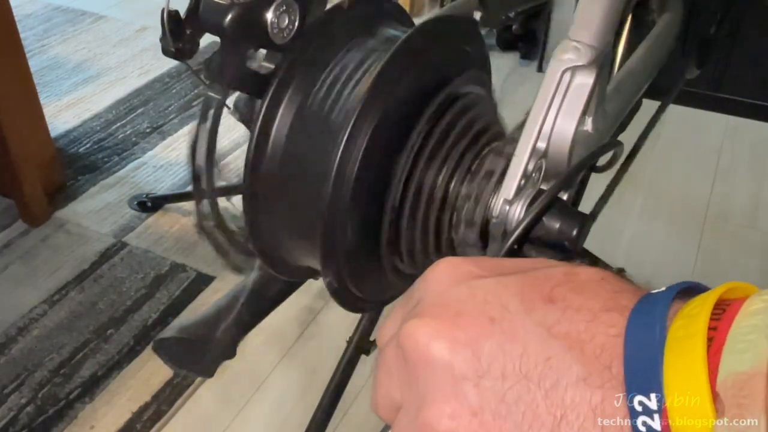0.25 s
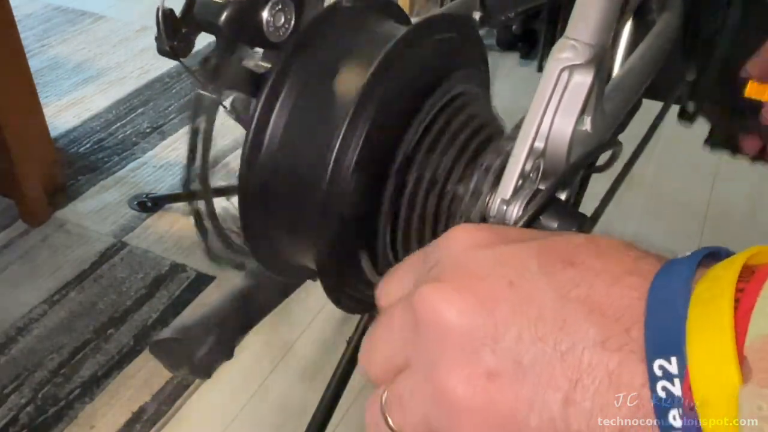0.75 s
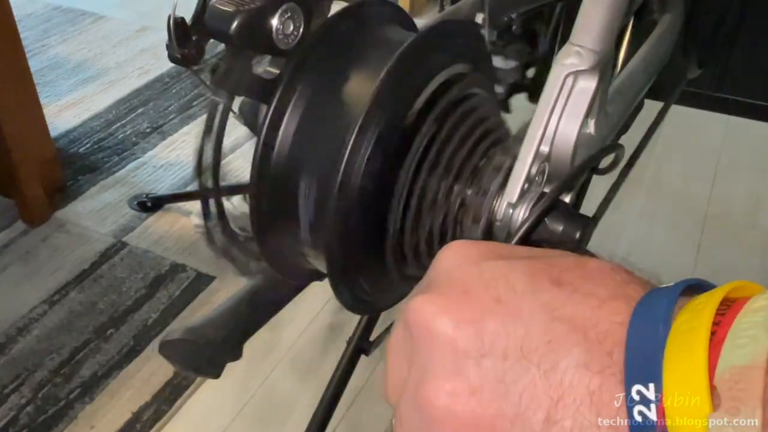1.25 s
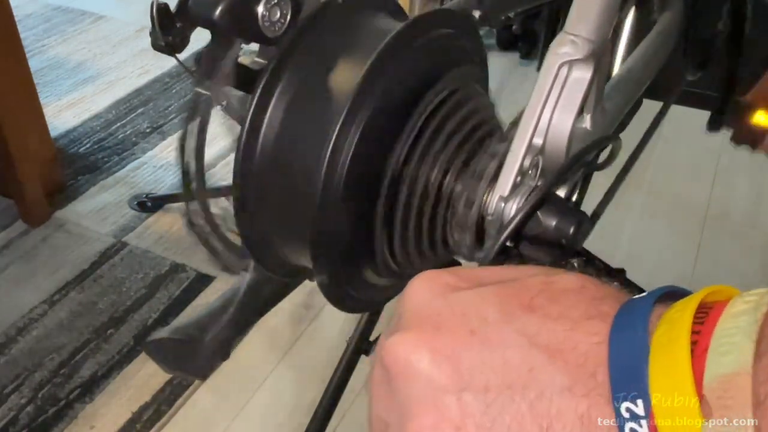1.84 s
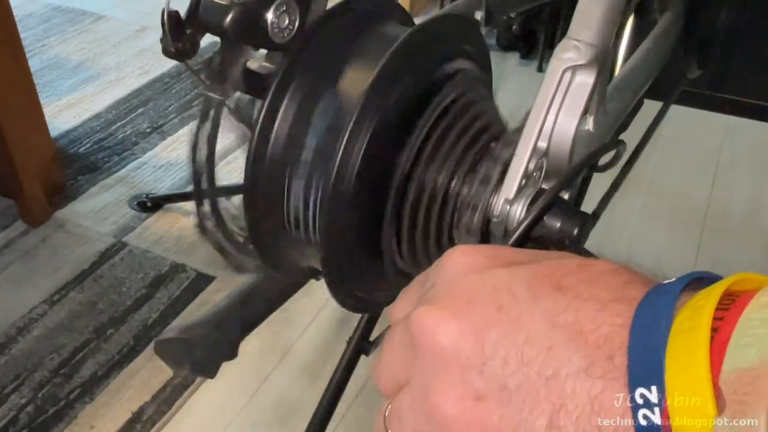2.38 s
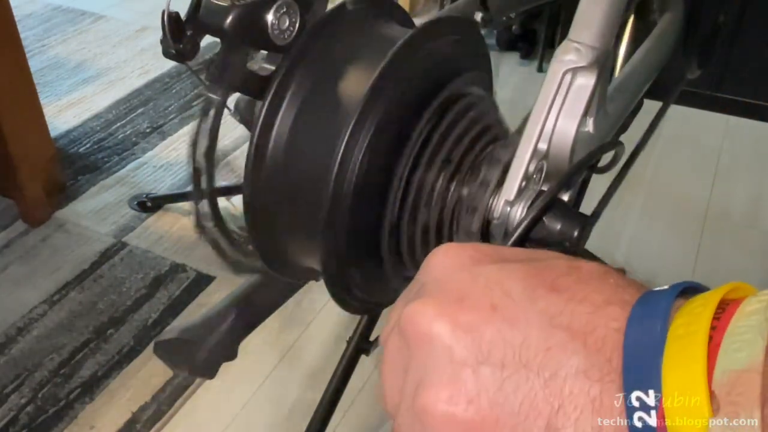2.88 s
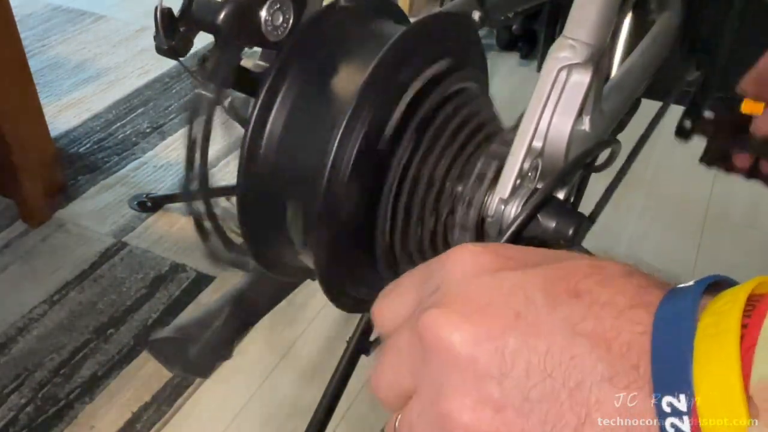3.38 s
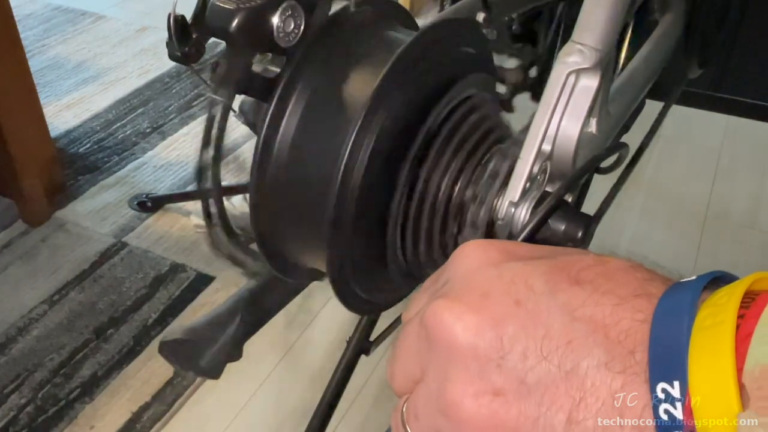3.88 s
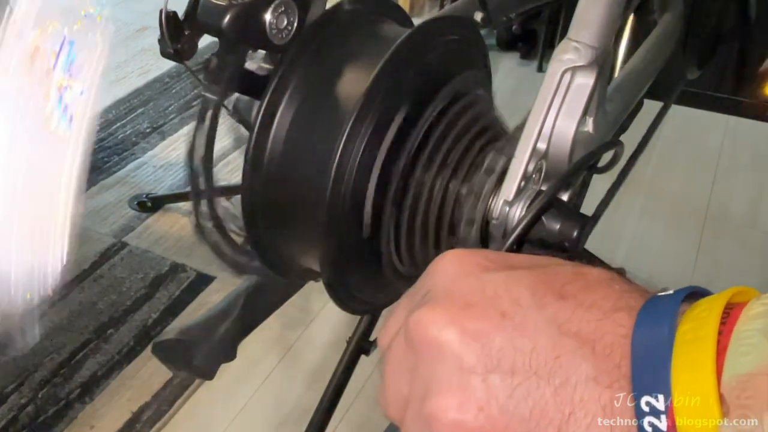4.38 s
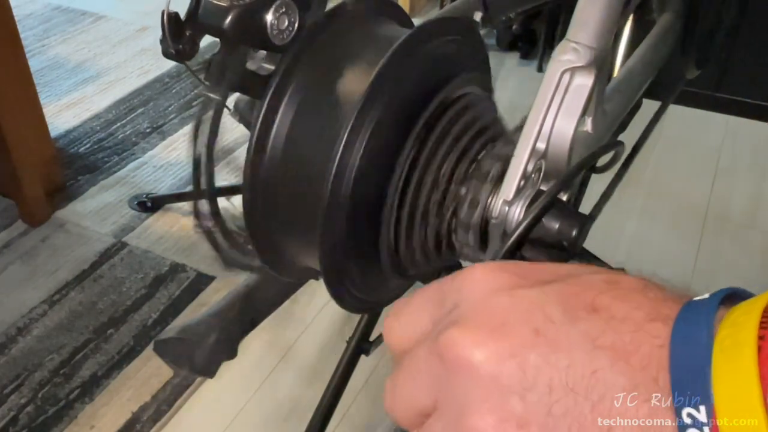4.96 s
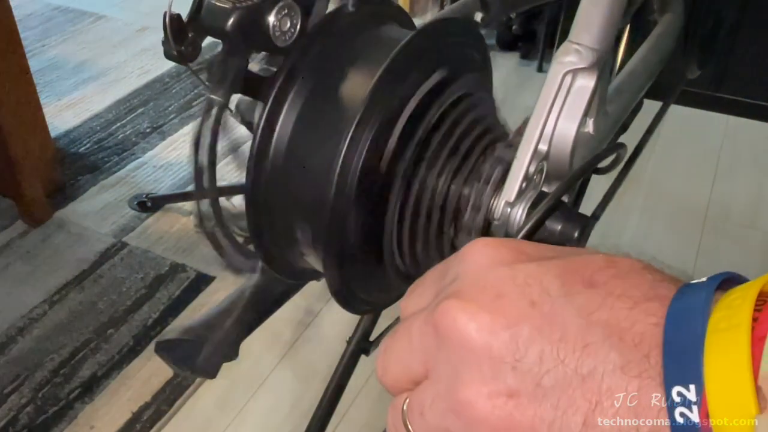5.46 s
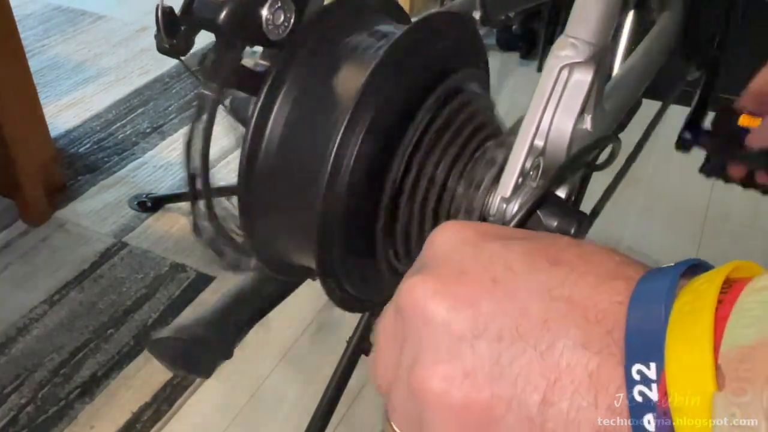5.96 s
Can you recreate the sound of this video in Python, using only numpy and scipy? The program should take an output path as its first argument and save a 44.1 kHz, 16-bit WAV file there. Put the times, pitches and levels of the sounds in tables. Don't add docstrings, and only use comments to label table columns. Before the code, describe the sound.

A bicycle wheel is cranked by hand on a stand in a small room, heard close in stereo. From 0 s a quiet bed runs throughout: low unsteady rumble, faint mains hum, dry grainy chain rustle and slightly irregular ticks, about 38 teeth a second, with thin clicks between. A soft frame knock comes near 0.3 s, a light slap at 0.7 s, a dull rock of the stand around 1 s, and small catches at 1.2 and 1.6 s. From 2.2 s the chain snaps back, soon roughly every 0.17 s, with slight wheel humming around 2.5 to 3.7 s. Snaps are moderate until 4.3 s, then grow hard: a small catch click followed by a bright, dry metallic crack, cage rattle and hollow thud. The loudest fall around 5.2, 5.6 and 5.9 s, with short room reflections, continuing until the cut near 6.2 s.

```python
import sys
import numpy as np
from scipy import signal
from scipy.fft import rfft, irfft, next_fast_len
from scipy.io import wavfile
from scipy.ndimage import map_coordinates

SR = 44100
rng = np.random.default_rng(int(sys.argv[2]) if len(sys.argv) > 2 else 0)


def volts_from_db(level):
    exponent = np.asarray(level, float) / 20
    return 10 ** exponent


def wav_record(signal):
    frames = np.transpose(np.atleast_2d(signal))
    bounded = np.clip(frames, -1, 1)
    quanta = np.round(bounded * 32767).astype(np.int16)
    wavfile.write(sys.argv[1], SR, quanta)


N = 274302
TIME_S = np.arange(N) / SR
TICK_GROWS = 0.2

# frequency_hz, level_db, t60_s
FRAME_MODES = [(197.8, -10, 0.12), (251, -8, 0.048), (352.2, 4, 0.049), (445, -10, 0.19), (485, -10, 0.13),
               (568.7, -1.5, 0.051), (664.6, -1.5, 0.067), (760, -8, 0.011), (1006, -4, 0.031)]
# frequency_hz, level_db (per Hz)
CONTACT_SPECTRUM = [(700, 19), (2500, 1), (5500, -9), (6300, -4), (7500, -0.5), (9100, -6), (10000, -2.5),
                    (11500, -2.5), (12500, -1), (14000, -10), (15000, -5)]
# start_s, peak_db, lower_ring_db, deep_knock_db, upper_knock_db
SNAPS = [(2.2299, -37, -6, -53, 0), (2.5798, -32.5, -21, -51, -5), (2.9378, -31, -12, -43, -8),
         (3.1219, -28, -12, -51, 1), (3.2843, -24.5, -16, -53, -1), (3.4683, -46, 7, -50.5, 0),
         (3.6296, -26.5, -13, -44.5, -7.5), (3.813, -27, -9.5, -47.5, -3), (3.9785, -32, -8, -50, -0.5),
         (4.1606, -28, -8, -48, -6), (4.3277, -24.5, -16, -48, -3), (4.4932, -20, -11.5, -50.5, 0),
         (4.683, -17, -10, -32, -2.5), (4.853, -18, -19, -39.5, -2.5), (5.0561, -24, -5, -36, -3.5),
         (5.2315, -15, -14.5, -30, -1.5), (5.398, -30, -30, -37, -5.5), (5.584, -14.5, -17.5, -36, 1),
         (5.7561, -20.5, -22, -47, 0), (5.9402, -15, -15, -33, -2.5), (6.118, -20, -8.5, -30, -9)]


def unit(x):
    return x / np.sqrt(np.mean(x ** 2) + 1e-20)


def along(points, hz):
    f, v = np.transpose(points)
    return np.interp(np.log(hz + 1), np.log(f + 1), v)


def over_time(points):
    return np.interp(TIME_S, *np.transpose(points))


def wobble(rate):
    knots = rng.standard_normal(int(N * rate / SR) + 4)
    return map_coordinates(knots, [np.arange(N) * rate / SR])


def noise():
    return rng.standard_normal((2, N))


def filtered(x, response):
    m = next_fast_len(N + SR)
    return irfft(rfft(x, m) * response(np.fft.rfftfreq(m, 1 / SR)), m)[..., :N]


def modal(modes):
    def response(hz):
        s = 2j * np.pi * hz
        total = 0
        for f, db, t60 in modes:
            omega = 2 * np.pi * f
            decay = np.log(1000) / t60
            total = total + volts_from_db(db) * omega * SR / ((s + decay) ** 2 + omega ** 2)
        return total
    return response


def hump(centre_hz, octaves):
    return lambda hz: 1 / (1 + (np.log2((hz + 1) / centre_hz) / octaves) ** 4)


def bare_contact(corner_hz):
    return lambda hz: volts_from_db(along(CONTACT_SPECTRUM, hz)) * hz ** 3 / (hz ** 3 + corner_hz ** 3)


def contacts(times, db, t60, count=400):
    t = np.arange(count) / SR
    envelope = volts_from_db(-60 * t / t60) * (1 - np.exp(-t / 0.00019))
    burst = rng.standard_normal((len(times), 2, count)) * envelope
    burst *= (volts_from_db(db)[:, None] / np.linalg.norm(burst, axis=2))[..., None]
    at = (np.round(times * SR).astype(int)[:, None] + np.arange(count)).ravel()
    return np.array([np.bincount(at, burst[:, k].ravel(), N + count)[:N] for k in range(2)])


def load(s):
    # time_s, level_db
    drag = [(0.0, -53.5), (1.16, -52.5), (1.42, -53), (2.74, -51), (3.13, -49.5), (3.67, -52),
            (4.68, -50.5), (5.21, -49.5), (5.72, -48), (5.96, -47.5), (6.1, -46), (6.22, -49.5)]
    at, db = np.transpose(drag)
    return np.interp(s, at, db - db.mean())


def stand():
    # frequency_hz, level_db, t60_s
    stand_modes = [(59, -4, 0.79), (79.2, -2, 0.5), (87.8, -13, 1), (130, -59, 0.034)]
    # time_s, level_db
    rocking = [(0.0, -59.5), (0.94, -58), (0.95, -49.5), (1.4, -59), (1.68, -56.5), (1.97, -61),
               (2.15, -51.5), (2.23, -59.5), (3.39, -50.5), (3.59, -60), (3.9, -52), (5.32, -52),
               (5.33, -57.5), (6.22, -54)]
    level_db = 2 + over_time(rocking) + 0.77 * wobble(9.8)
    push = volts_from_db(1.4 * wobble(13)) * noise()
    return volts_from_db(level_db) * unit(filtered(push, modal(stand_modes)))


def mains():
    level_db = -59.5 + 3.5 + 1.5 * wobble(2.6)
    hum = volts_from_db(level_db) * np.sin(2 * np.pi * 59.8 * TIME_S + 1.6 * wobble(2.7))
    return np.array([hum, .4 * hum])


def rustle():
    # frequency_hz, level_db (per Hz)
    rustle_spectrum = [(100, 5.5), (600, 5.5), (1300, -4), (4500, -6), (6500, -5.5), (9000, -15),
                       (11000, -15.5), (12700, -38), (13800, -14.5), (14900, -7.5)]
    level_db = -53 + 0.98 * load(TIME_S)
    grit = volts_from_db(1.2 * wobble(40) + 3.04 * wobble(160))
    tilt = lambda hz: volts_from_db(along(rustle_spectrum, hz))
    return volts_from_db(level_db) * unit(filtered(grit * noise(), tilt))


def frame():
    level_db = -55.5 + 0.83 * load(TIME_S) + 0.69 * wobble(5.39)
    return volts_from_db(level_db) * unit(filtered(noise(), modal(FRAME_MODES)))


def jockey_hum():
    # frequency_hz, level_db, t60_s
    jockey_modes = [(583.5, 13.5, 0.21), (666, -1.5, 0.6)]
    # time_s, level_db
    side_pull = [(0, -63), (1.7, -72), (2.5, -60.5), (3.2, -60), (3.7, -62), (6.22, -69)]
    level_db = over_time(side_pull) + 1.2 * wobble(7.1)
    return volts_from_db(level_db) * unit(filtered(noise(), modal(jockey_modes)))


def teeth():
    turns = [-0.3137, 0.0574, 0.4286, 0.7937, 1.1574, 1.5244, 1.8902, 2.2474, 2.6, 2.9512, 3.2954, 3.6444,
             3.9911, 4.3391, 4.683, 5.0295, 5.3761, 5.7338, 6.0903, 6.4468]
    per_turn = 14
    count = np.arange(per_turn * len(turns))
    return np.interp(count / per_turn, np.arange(len(turns)), turns)[:-per_turn]


def ticks():
    early_s, jitter_s, settle_s = .002, .002, .005
    seat_db, settle_db, spread_db = -41.5, -43.5, 2
    lower_ring_db = -14.5
    seat = teeth()
    u, g = rng.random(len(seat)), rng.standard_normal((len(seat), 3))
    first = seat - early_s + jitter_s * g[:, 0]
    s = np.r_[first, first + settle_s * (.5 + u)]
    db = np.r_[seat_db + spread_db * g[:, 1], settle_db + spread_db * g[:, 2]]
    db = db + TICK_GROWS * load(s)
    heard = (s > 0) & (s < N / SR)
    return np.c_[s, db, np.full(len(s), lower_ring_db)][heard]


def chain():
    # start_s, peak_db, lower_ring_db
    slaps = [(0.6617, -37.5, -11), (1.9904, -38.5, -21), (2.0698, -38.5, -21), (2.2728, -37.5, -16),
             (3.0034, -39, -14), (3.0262, -50, -18), (3.0965, -39.5, 2), (3.3415, -44, -16),
             (3.3723, -49, -14), (3.4761, -36, -3), (5.1924, -37, -10), (5.6646, -36, -12),
             (6.156, -37, -8), (1.104, -50, 11), (4.3424, -39, -14), (4.5195, -27.5, -36),
             (4.8673, -38.5, 2.5), (4.9541, -23.5, -14), (5.0895, -60, -3), (5.2343, -11, -14),
             (5.588, -11.5, -27), (5.7886, -47, 10), (5.821, -35.5, -26), (5.9437, -14.5, -8),
             (5.9622, -49, -11)]
    # start_s, peak_db, lower_ring_db
    catches = [(1.2374, -36.5, -18), (1.6197, -35, -17), (1.893, -45, -4), (2.5719, -47, 6),
               (2.8034, -46, -10), (2.922, -48, 5), (3.266, -39, -4), (3.7966, -39, 3.5), (3.961, -39, -5),
               (4.146, -41, -2.5), (4.308, -29.5, -2.5), (4.483, -23, -17.5), (4.6558, -24.5, -13),
               (4.839, -27, -14), (5.0306, -28, -6.5), (5.202, -22, -14), (5.375, -31.5, 1),
               (5.5552, -25, -29), (5.7337, -31, -4), (5.912, -25, -13), (6.0897, -25.5, -12)]
    # frequency_hz, level_db, t60_s
    steel_modes = [(4700, -6, .012), (6370, 0, .03), (7130, -6, .02), (8100, -6, .015), (9940, -2, .04),
                   (11450, 0, .015), (12250, -4, .035), (14950, -1, .018)]
    # frequency_hz, level_db, t60_s
    cage_modes = [(1500, -5, .022), (1870, -2, .03), (2040, 0, .035), (2450, -2, .03), (2950, -3, .02),
                  (3900, -4, .015), (5200, -3, .015)]
    s, db, ring_db = np.vstack([slaps, catches, np.array(SNAPS)[:, :3], ticks()]).T
    blows = contacts(s, db, t60=0.012)
    shiver = contacts(s, db - 10.0, t60=0.023, count=2600)
    crack = volts_from_db(22.0) * filtered(blows + shiver, bare_contact(4000))
    sprockets = volts_from_db(-16) * filtered(blows, modal(steel_modes))
    low = contacts(s, db + ring_db, t60=0.065, count=800)
    cage = volts_from_db(-15.0) * filtered(low, modal(cage_modes))
    cage = cage + volts_from_db(21.0) * filtered(low, hump(2310, octaves=0.7))
    return crack + sprockets + cage


def side_plates(count=2):
    # start_s, level_db
    pings = [
        (4.9541, -36),
        (5.7337, -50),
    ]
    # frequency_hz, level_db, t60_s
    plate_modes = [(2800, 0, .015), (3000, 0, .018), (3200, -10, .07), (6300, -3, .015)]
    meets = teeth()
    seat = np.repeat(meets, count)
    s = seat + rng.random(len(seat)) * np.repeat(np.gradient(meets), count)
    db = -48 + 5.5 * rng.standard_normal(len(seat)) + TICK_GROWS * load(s)
    heard = (s > 0) & (s < N / SR)
    strays = contacts(s[heard], db[heard], t60=.002)
    clicks = volts_from_db(20) * filtered(strays, bare_contact(10000))
    return clicks + filtered(contacts(*np.transpose(pings), t60=0.0013), modal(plate_modes))


def knocks():
    # start_s, deep_knock_db, upper_knock_db
    thumps = [(0.32, -47.5, -1), (0.958, -44, -13), (0.979, -55, -16), (1.009, -64, -9), (1.159, -49, -15),
              (2.099, -46, -20), (3.409, -57, 1), (4.344, -37, -13), (4.699, -46, -5), (5.248, -44, 0.5),
              (6.128, -40, -4)]
    s, db, upper_db = np.vstack([thumps, np.array(SNAPS)[:, [0, 3, 4]]]).T
    deep = contacts(s, db, t60=0.071, count=2000)
    upper = contacts(s, db + upper_db, t60=0.1, count=2000)
    deep_ring = volts_from_db(-5) * filtered(deep, modal(FRAME_MODES[:4]))
    deep_thud = volts_from_db(36.5) * filtered(deep, hump(253, octaves=0.53))
    tubes = lambda hz: hump(700, octaves=.6)(hz) + volts_from_db(-47) * modal(FRAME_MODES[4:])(hz)
    return deep_ring + deep_thud + volts_from_db(42.0) * filtered(upper, tubes)


def room(x, count=24):
    # frequency_hz, t60_s
    decay = [(200, 0.39), (1000, 0.64), (5000, 0.2), (15000, 0.16)]
    hz, t, z = signal.stft(rng.standard_normal((count, 2, SR // 2)), SR, nperseg=256)
    tails = signal.istft(z * volts_from_db(-60 * t / along(decay, hz)[:, None]), SR, nperseg=256)[1]
    wet, at = np.zeros((2, N + SR)), 150
    for piece, tail in zip(np.array_split(x, count, axis=1), tails):
        answer = signal.fftconvolve(piece, tail / np.linalg.norm(tail[0]), axes=1)
        wet[:, at:at + answer.shape[1]] += answer
        at += piece.shape[1]
    return wet[:, :N]


def scene():
    steady = stand() + mains() + rustle() + frame() + jockey_hum()
    hits = chain() + side_plates() + knocks()
    return steady + hits + volts_from_db(-8.5) * room(hits)


def low_pass(x):
    return signal.sosfilt(signal.butter(12, 16950, fs=SR, output="sos"), x)


def record(dry):
    # frequency_hz, coherence (0 to 1)
    alike = [(60, 0.86), (250, 1), (600, 0.53), (1200, 0.31), (2500, 0.68), (4200, 0.057), (5500, 0.99),
             (7000, 0.85), (8500, 0.86), (12000, 0.94)]
    # frequency_hz, phase_rad
    lead = [(0, .1), (1030, .6), (1550, -.5), (2400, .4), (3600, 1.8), (4700, .6), (5500, -1.7),
            (6800, -1.9), (7700, -2.7), (8600, -3.14), (9400, -3.4), (11400, -4.9), (13400, -6.3),
            (16500, -6.3)]
    # frequency_hz, level_db
    lean = [(60, 1.5), (110, 6.5), (200, -1), (380, 0), (700, 0), (1290, 2.5), (2380, -0.5), (4400, 3),
            (8120, -0.5), (15000, 0.0)]
    # frequency_hz, level_db
    upper_edge = [(15500, 0), (15850, -5), (15950, -25), (16550, -30), (16750, -70)]

    def split(hz):
        angle = np.arccos(np.clip(along(alike, hz), 0, 1)) / 2
        return np.array([np.cos(angle), np.sin(angle)])

    def port_response(hz):
        half = volts_from_db(along(lean, hz) / 2) * np.exp(.5j * along(lead, hz))
        low_cut = hz ** 4 / (hz ** 4 + 45 ** 4)
        return np.array([half, 1 / half]) * low_cut * volts_from_db(along(upper_edge, hz))

    shared, differing = filtered(dry, split)
    ports = filtered(np.array([shared + differing, shared - differing]), port_response)
    return low_pass(ports)


dry = scene()
out = record(dry)
wav_record(out)
```